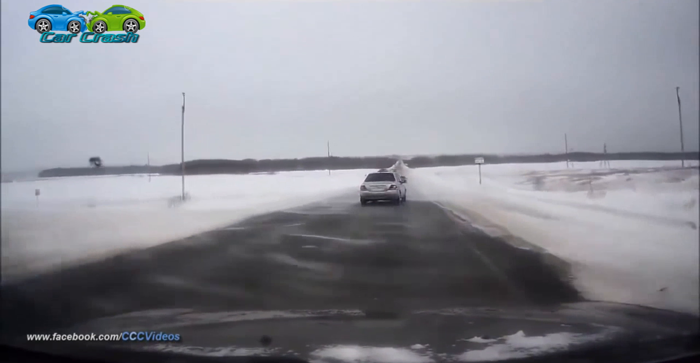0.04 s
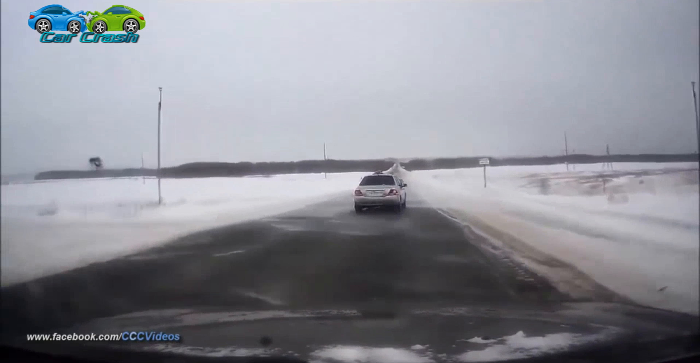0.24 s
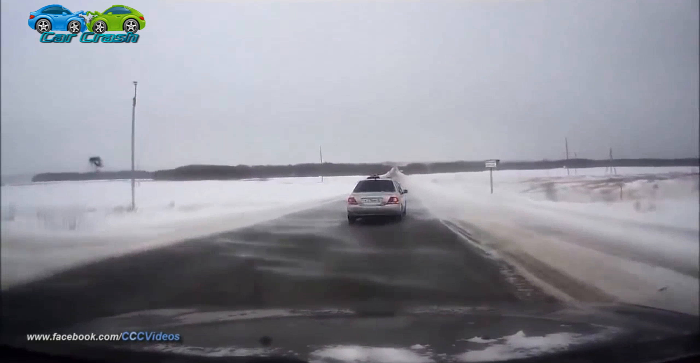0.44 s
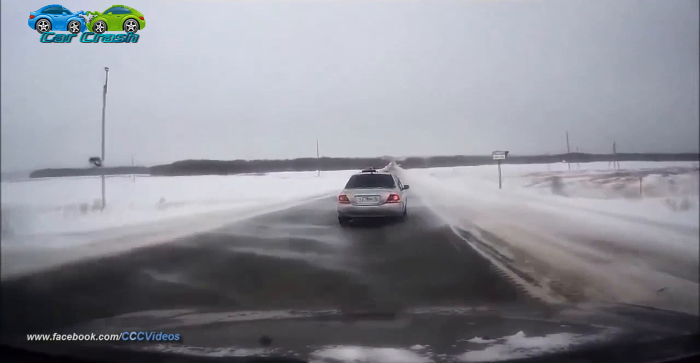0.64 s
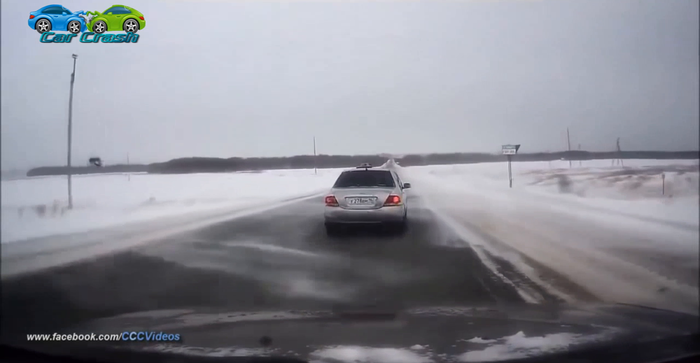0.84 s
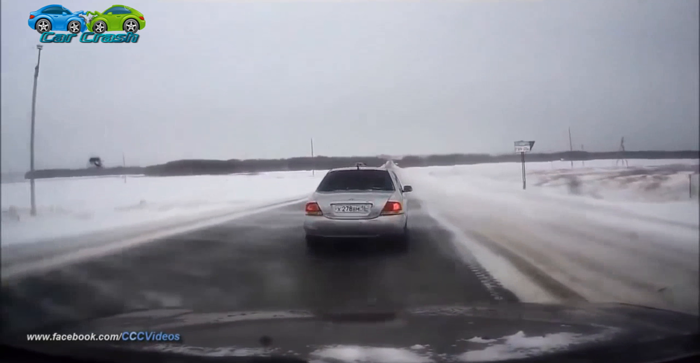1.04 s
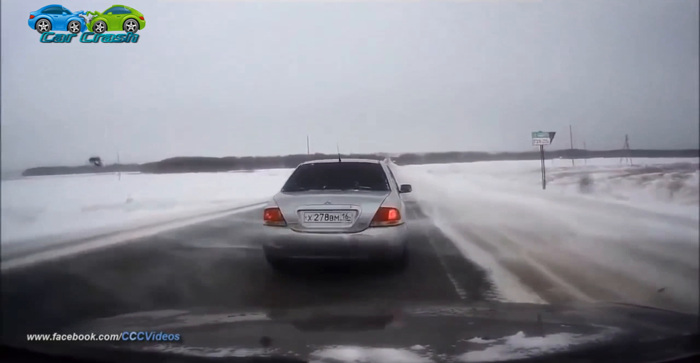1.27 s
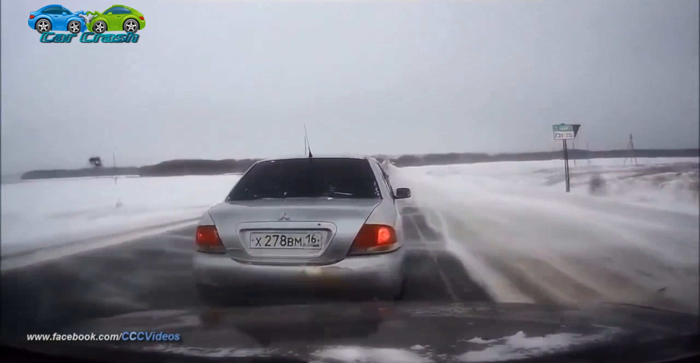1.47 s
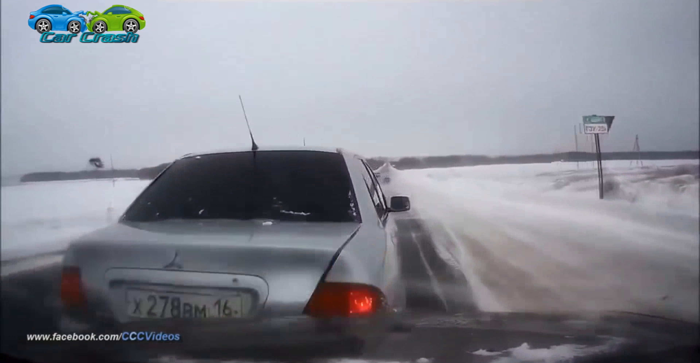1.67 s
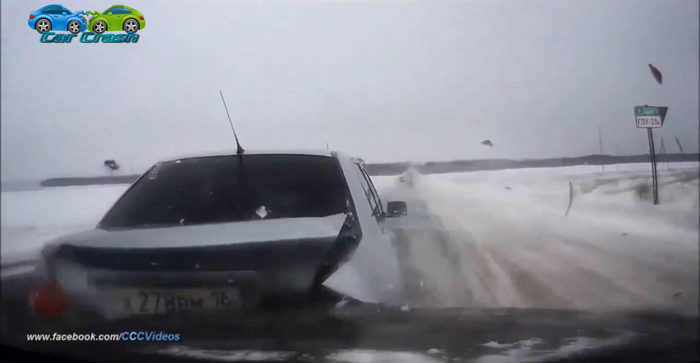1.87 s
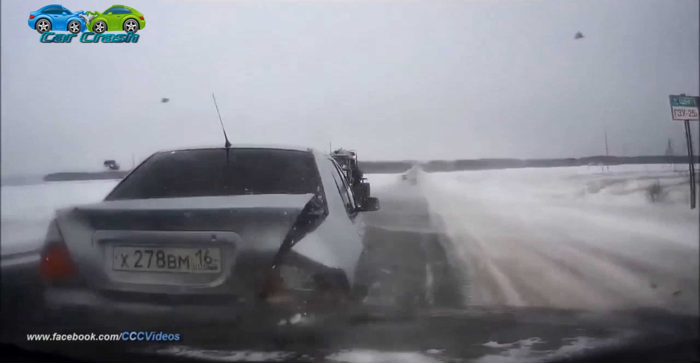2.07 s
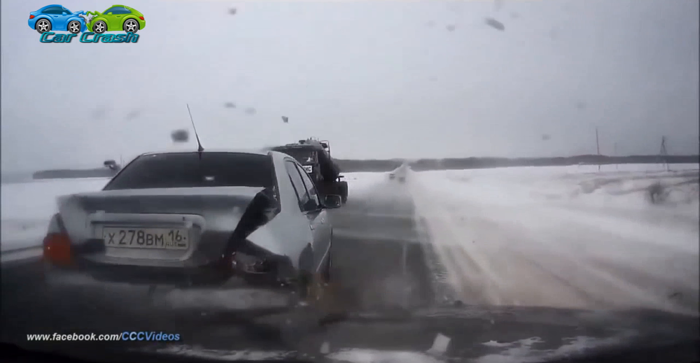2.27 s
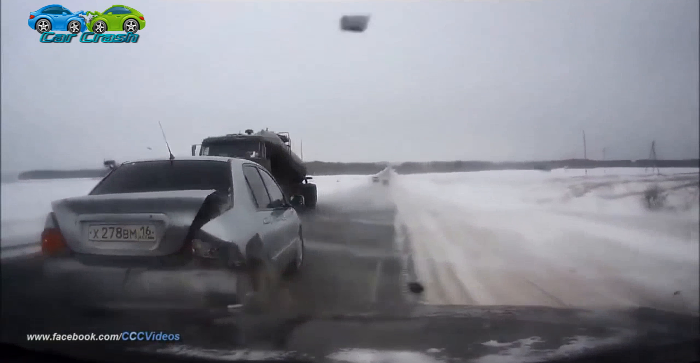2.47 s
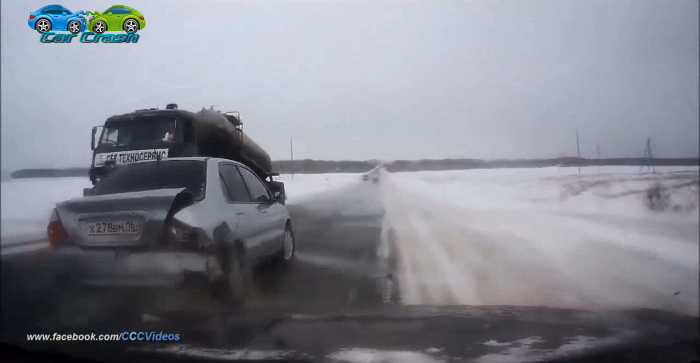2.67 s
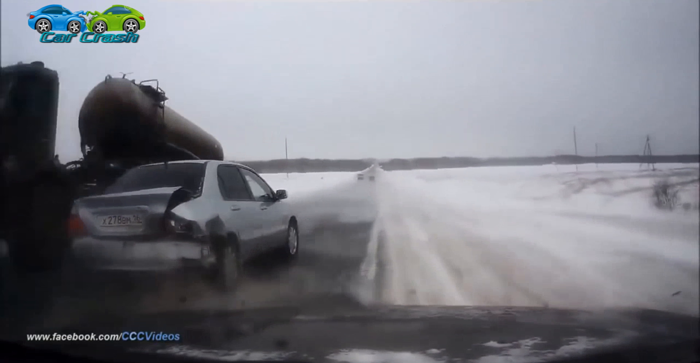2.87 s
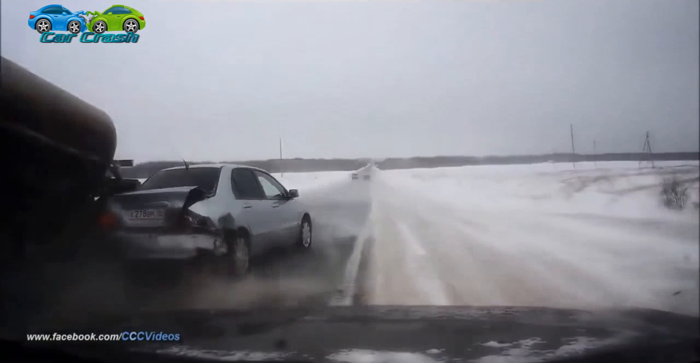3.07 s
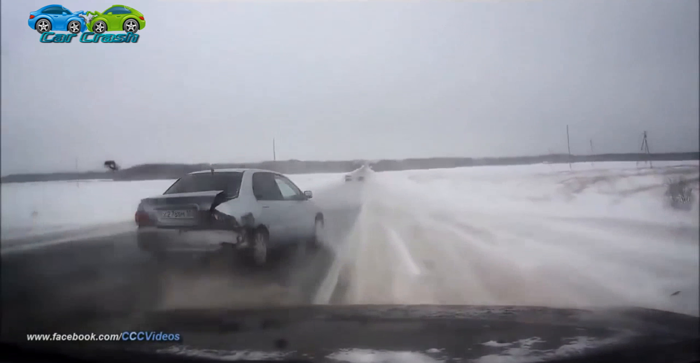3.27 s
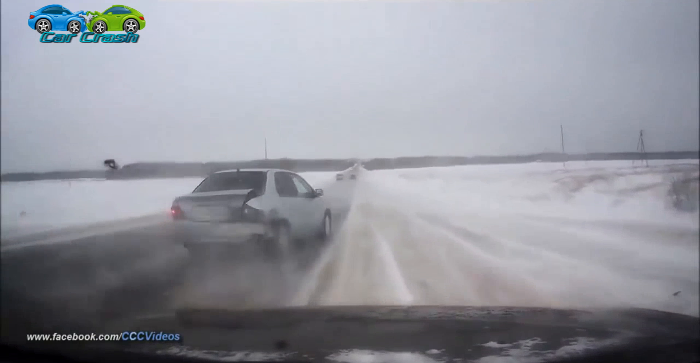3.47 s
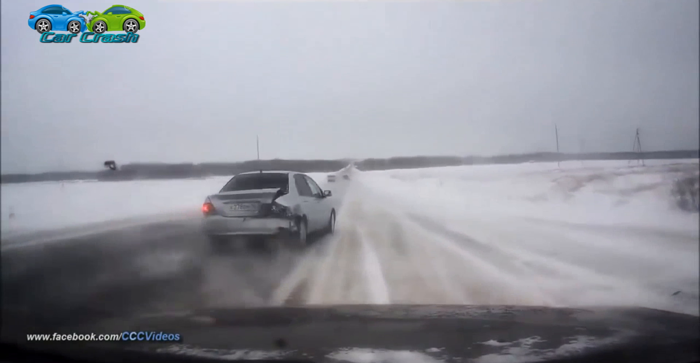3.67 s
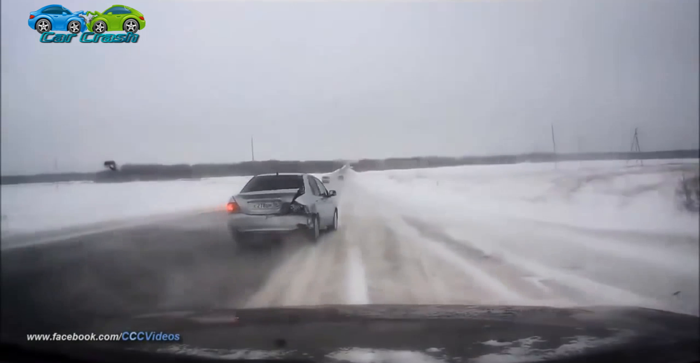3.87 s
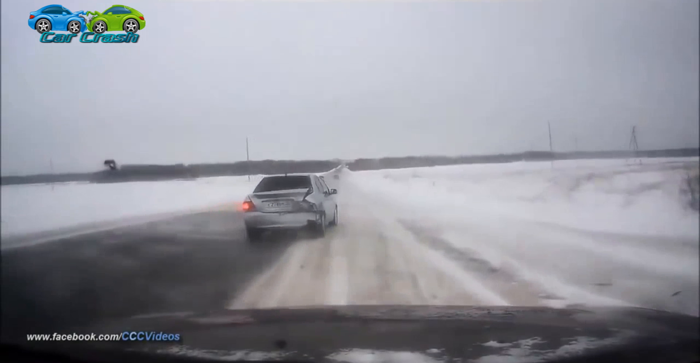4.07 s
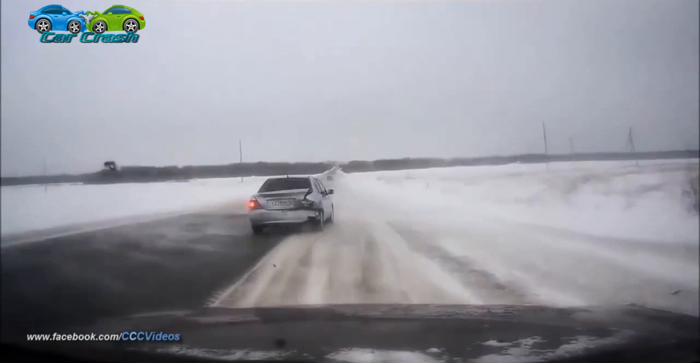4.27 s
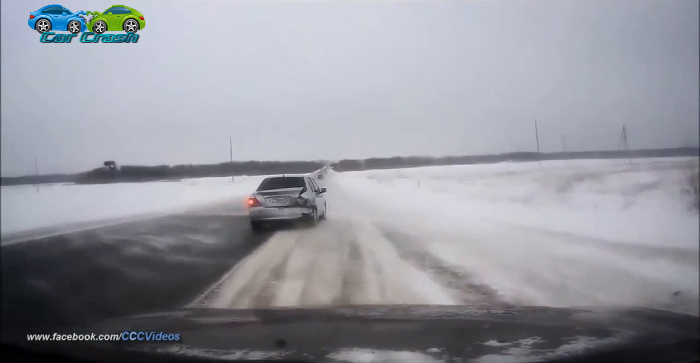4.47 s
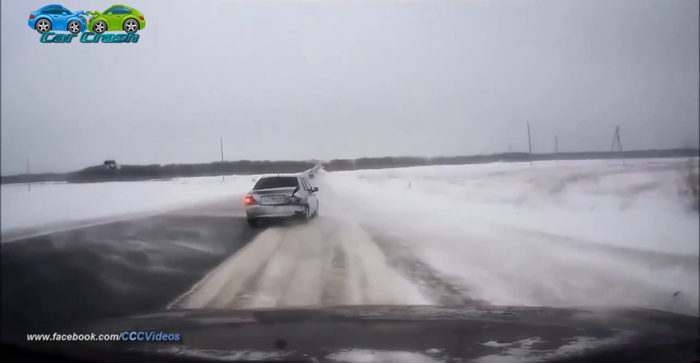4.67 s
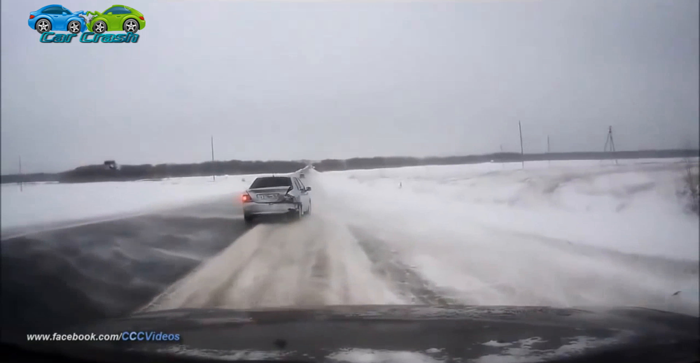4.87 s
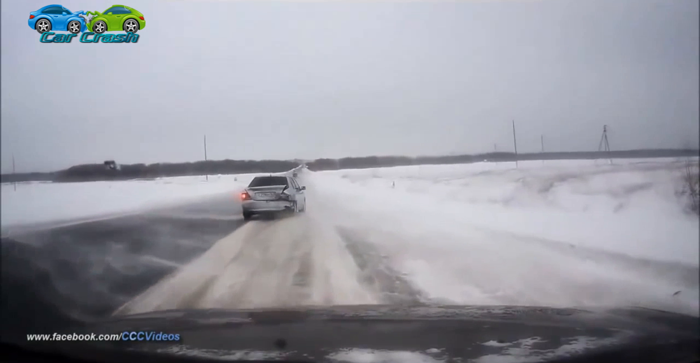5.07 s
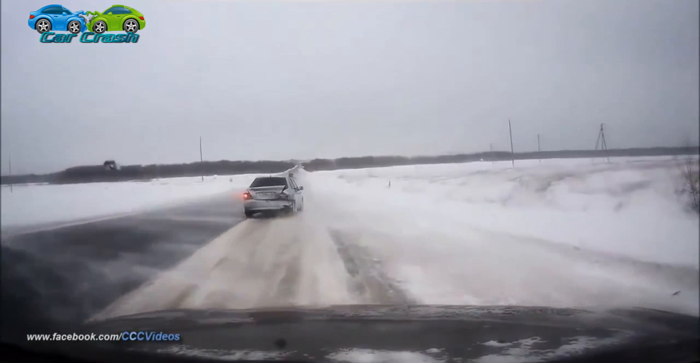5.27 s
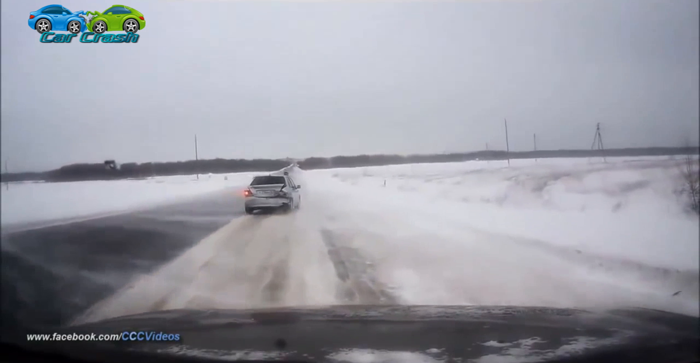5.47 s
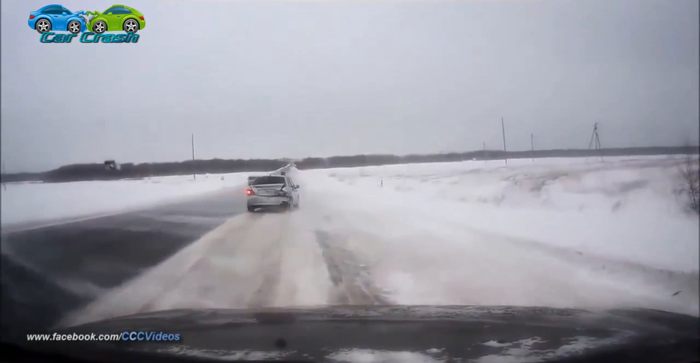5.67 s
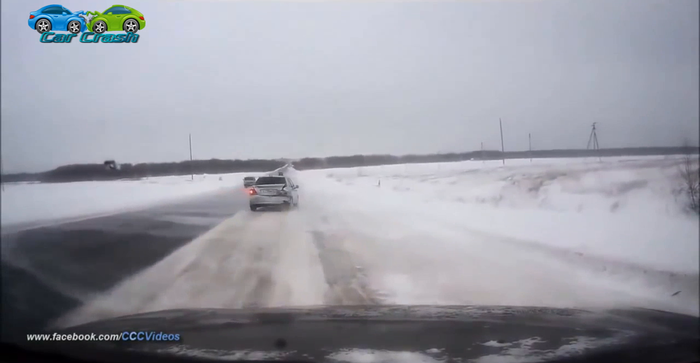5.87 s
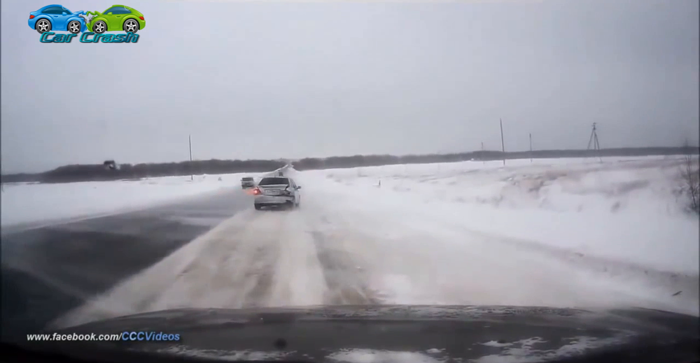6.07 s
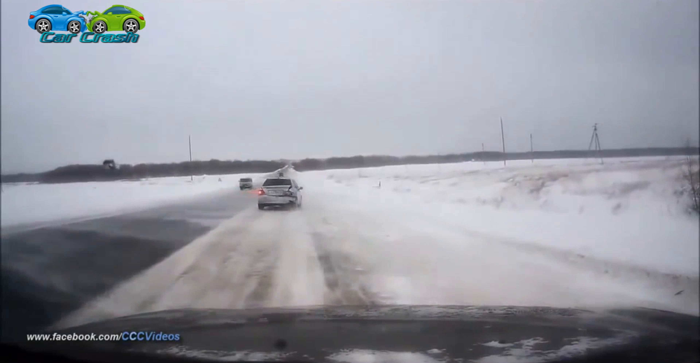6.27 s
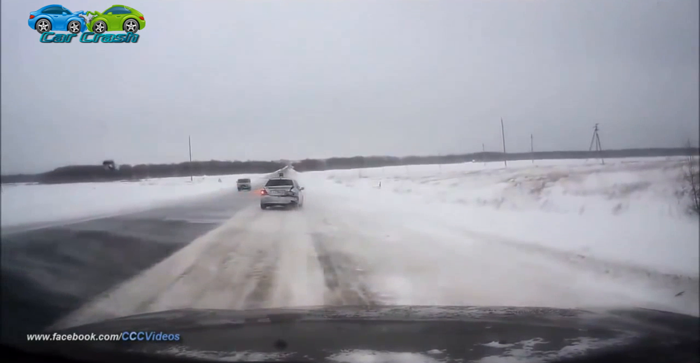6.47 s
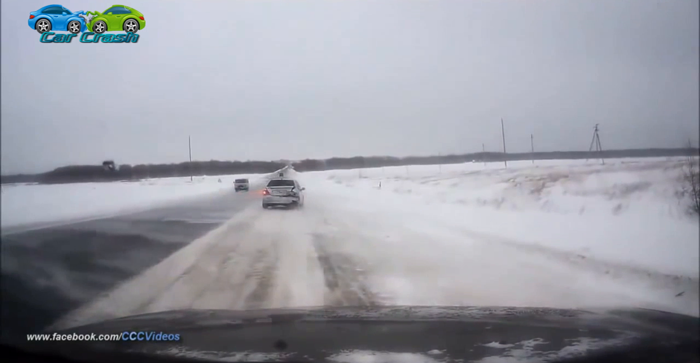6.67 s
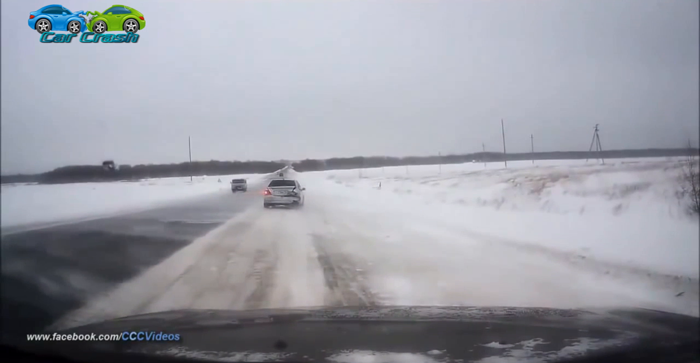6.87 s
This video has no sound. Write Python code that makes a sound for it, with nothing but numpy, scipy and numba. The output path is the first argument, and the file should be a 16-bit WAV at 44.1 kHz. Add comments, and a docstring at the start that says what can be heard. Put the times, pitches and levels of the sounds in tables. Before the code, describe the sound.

Heard from a dashboard microphone inside a car on a snowy road: deep rumble, tyre roar and faint slush hiss. Nearly two seconds in, a sudden crash booms and crunches, clipping flat, with crumpling metal and splintering plastic. Loose objects knock and rattle around the cabin, then a bent part taps regularly while the car slows and the road noise sinks toward quiet.

```python
"""Inside a car on a snowy road: tyre rumble, roar and slush hiss, then a rear-end crash that overloads the
dashboard camera. Sinking low notes and jerky bursts of noise make the crushed panels. Short pushes and
rattles ring the cabin trim as loose things knock about, and a bent part taps once a wheel turn as the car
slows. Ridges thump, bent metal scrapes, and the preamp adds a faint hiss and a thin whine."""
import sys
import numpy as np
from scipy import signal
from scipy.fft import rfft, irfft
from scipy.io import wavfile
from scipy.ndimage import uniform_filter1d
from numba import njit

SR = 44100
rng = np.random.default_rng(int(sys.argv[2]) if len(sys.argv) > 2 else 0)


def volts_from_decibels(level):
    """Turn decibel levels (scalar or array-like) into linear amplitude factors."""
    exponent = np.asarray(level, float) / 20
    return 10 ** exponent


def file_out(sig):
    """Save sig as 16-bit WAV at sys.argv[1]."""
    # one column per channel
    cols = np.atleast_2d(sig).T
    # limit, then scale
    lim = np.clip(cols, -1, 1)
    pcm = np.round(lim * 32767).astype(np.int16)
    wavfile.write(sys.argv[1], SR, pcm)


N = 306042  # length in samples
T = np.arange(N) / SR  # time in seconds

# How the body booms over the road, also used for its shaking in the crash.
# Each row: frequency in Hz, relative strength in dB per Hz.
RUMBLE_SPECTRUM = [(12, -37), (22, -2), (38, -0.5), (52, -5), (68, 1.5), (92, -3.5), (122, -3.5),
                   (150, -8.5), (185, -18), (220, -18), (290, -27.5), (480, -97.5)]


def level(x):
    """Scales a sound to an rms (average strength) of 1."""
    return x / np.sqrt(np.mean(x ** 2))


def coloured(x, spectrum):
    """Filters x by a curve of (Hz, dB) points, then scales it to an rms of 1."""
    hz, db = np.transpose(spectrum)
    log_hz = np.log(np.arange(N // 2 + 1) * SR / N + 1)
    gain = volts_from_decibels(np.interp(log_hz, np.log(hz), db, left=-90, right=-90))
    return level(irfft(rfft(x) * gain, N))


@njit
def svf(x, hz, width):
    """Resonant band-pass filter whose centre and width (Hz) are given for every sample."""
    y, band, low = np.empty(len(x)), 0., 0.
    for i in range(len(x)):
        g = np.tan(np.pi * hz[i] / SR)
        damping = width[i] / hz[i]
        v = (band + g * (x[i] - low)) / (1 + g * (g + damping))
        band = 2 * v - band
        low = low + 2 * g * v
        y[i] = damping * v
    return y


def walk(rate):
    """Slow random wandering: levels held for 1 / rate seconds, smoothed twice; spread near 1."""
    hold = int(SR / rate)
    steps = np.repeat(rng.standard_normal(N // hold + 1), hold)
    return 1.6 * uniform_filter1d(uniform_filter1d(steps, hold), hold)[:N]


def grit(spread_db, flicker_db, rate):
    """Dense particles of uneven size whose flow flickers."""
    size_db = spread_db * rng.exponential(size=N)
    return rng.standard_normal(N) * volts_from_decibels(size_db + flicker_db * walk(rate))


def burst(s, db, rise_s, t60):
    """Gain that swells from time s and dies away by 60 dB every t60 seconds."""
    t = np.maximum(T - s, 0)
    return volts_from_decibels(db - 60 * t / t60) * (1 - np.exp(-t / rise_s))


def booming():
    """The struck shell booms on unsteady sinking notes over a rough heave."""
    # Each row: start in seconds, level in dB, starting note in Hz, seconds to die by 60 dB.
    booms = [(1.72, -1.5, 119.4, .3), (1.745, 2, 54.6, 0.36), (1.793, -4, 140, 0.34),
             (1.85, -0.5, 27.7, 0.28), (1.885, -1, 57.7, 0.25), (1.935, -13.5, 30, .25),
             (2.0, -17.5, 44.4, 0.44), (2.127, -6, 121.3, 0.1), (2.157, -6.5, 140.2, .25)]
    # Rough shaking of the whole shell: start in seconds, level in dB, rise in seconds, seconds to die by 60 dB.
    heave = (1.72, -5, .012, 0.56)
    rise_s, sag_per_s = 0.0066, 2.2  # sag: how fast each note sinks
    unsteady, stiff = np.exp(.1 * walk(80)), .25 * walk(60)
    boom = burst(*heave) * coloured(rng.standard_normal(N), RUMBLE_SPECTRUM)
    for s, db, hz, t60 in booms:
        note_hz = hz * unsteady * np.exp(-sag_per_s * (T - s)) * (T > s)
        phase = 2 * np.pi * np.cumsum(note_hz) / SR
        # a second, stiffer shell mode comes and goes
        boom = boom + burst(s, db, rise_s, t60) * (np.sin(phase) + stiff * np.sin(1.8 * phase))
    return boom


def tearing():
    """Panels give way: sheet metal crumples and plastic splinters, both as gritty noise in jerks."""
    # Each row: start in seconds, crumple level in dB, splinter level in dB, seconds to die by 60 dB.
    tears = [(1.726, -8.5, -27.5, 0.43), (1.754, -8, -27.5, 0.16), (1.785, 5, -13, 0.084),
             (1.824, -13.5, -33, 0.42), (1.869, -16.5, -36, 0.42), (1.924, -15.5, -27, 0.19),
             (1.99, -28, -50, 0.46), (2.129, -25.5, -37.5, 0.54), (2.163, -25, -33.5, 0.19),
             (2.234, -27, -45, .4), (2.325, -35.5, -47, 0.63), (2.385, -34, -49.5, 0.27)]
    # The sound of sheet metal. Each row: frequency in Hz, relative strength in dB per Hz.
    crumple_spectrum = [(110, -14.5), (180, 9.5), (241, 2), (435, -5.5), (611, -0.5), (941, -9.5),
                        (1310, -14), (1700, -27.5), (2210, -58.5), (3740, -120)]
    # The sound of plastic. Each row: frequency in Hz, relative strength in dB per Hz.
    splinter_spectrum = [(1000, -33.5), (1700, -5), (2120, 1), (2630, 3.5), (3460, -3.5), (3800, -3),
                         (4970, -14), (5660, -12.5), (8820, -20), (13500, -21), (15900, -24)]
    rise_s = 0.0046
    jerks = volts_from_decibels(1.54 * walk(200))
    crumple = coloured(grit(spread_db=4.0, flicker_db=1.5, rate=60), crumple_spectrum)
    crumple = crumple * sum(burst(s, db, rise_s, t60) for s, db, _, t60 in tears)
    splinter = coloured(grit(spread_db=3.0, flicker_db=-2.05, rate=120), splinter_spectrum)
    splinter = splinter * sum(burst(s, db, rise_s, t60) for s, _, db, t60 in tears)
    return jerks * (crumple + splinter)


def ring_trim(contacts, push_s, rattle):
    """Each contact is a short push and a dying rattle that ring the trim, most near the struck spot's note."""
    # What cabin trim rings with. Each row: frequency in Hz, width in Hz, strength in dB.
    trim = [(420, 160, -1), (600, 130, 1), (810, 170, 0), (1050, 200, -4), (1300, 180, -6), (1650, 240, -5),
            (2000, 220, -2), (2480, 240, 0), (3050, 480, -4), (3750, 480, -8), (5400, 1100, 0),
            (6600, 1400, -4), (8500, 2500, -5), (12000, 4000, -6)]
    out, t = np.zeros(N), np.arange(SR // 9) / SR
    for s, dull_db, bright_db, crack_db, spot_hz in contacts:
        # 0.054 s at 1 kHz and a -44 dB bright ring; higher spots and harder pieces die sooner
        t60 = 0.054 * (spot_hz / 1e3) ** -.4 * volts_from_decibels(-0.1 * (bright_db + 44))
        push = (t < push_s) / np.sqrt(push_s * SR)
        contact = push + rattle * rng.standard_normal(len(t)) * volts_from_decibels(-60 * t / t60)
        rings = np.zeros((3, len(t)))  # dull, bright and crack
        for hz, width, db in trim:
            near_db = 11 * np.exp(-(np.log(hz / spot_hz) / .2) ** 2)
            f, w = hz + 0 * t, width + 0 * t
            ring = svf(svf(contact, f, w), f, 2 * w) / np.sqrt(width)
            band = np.searchsorted([1500, 4500], hz)
            rings[band] += volts_from_decibels(db + near_db) * ring
        for band, top_hz in ((0, 1500), (1, 4500)):
            # padding dulls each ring
            rings[band] = signal.lfilter(*signal.butter(3, top_hz, fs=SR), rings[band])
        gains = volts_from_decibels([dull_db, bright_db, crack_db]) / np.abs(rings).max(axis=1)
        i = int(s * SR)
        out[i:i + len(t)] += (gains @ rings)[:N - i]
    return out


def knocking():
    """Loose things knock about the cabin and ring its trim."""
    # Each row: start in seconds, peaks of the dull, bright and crack parts in dB, note of the struck spot in Hz.
    knocks = [(1.927, -11, -18, -33, 805), (2.073, -8.5, -10.5, -28, 790), (2.167, -10, -15.5, -39, 1977),
              (2.256, -22, -25, -54, 772), (2.327, -27.5, -44, -55, 1350), (2.377, -25.5, -47, -58.5, 573),
              (2.457, -45, -48.5, -57, 3600), (2.483, -23, -14.5, -27.5, 3360),
              (2.529, -44, -38, -53, 3320), (2.549, -45.5, -41, -53, 3500), (2.617, -48, -44.5, -52, 3670),
              (2.715, -43, -43, -68, 3820), (2.821, -31, -56, -70, 445), (3.046, -19.5, -48, -72, 673),
              (3.087, -32, -40, -70, 2820), (3.145, -31, -42.5, -58, 3740), (3.351, -24.5, -29, -56, 2020),
              (3.478, -45, -41.5, -62.5, 3800), (4.082, -53, -52, -82, 2500), (4.454, -59, -54, -66, 4000),
              (4.77, -61, -49, -61.5, 2630), (6.16, -42, -47.5, -68, 2725), (6.23, -31, -49.5, -79.5, 1240),
              (6.44, -36.5, -52, -84, 2480), (6.925, -32, -51, -76, 860)]
    return ring_trim(knocks, push_s=.00006, rattle=.25)


def tapping():
    """A bent part touches once a wheel turn, with more rattle than the loose things."""
    # Each row: start in seconds, peaks of the dull and bright parts in dB, note of the struck spot in Hz.
    taps = [(3.443, -31, -39.5, 600), (3.738, -26, -40, 2540), (4.015, -30.5, -44.5, 620),
            (4.287, -33, -59, 610), (4.584, -37, -49, 2460), (4.902, -43, -48.5, 2250),
            (5.219, -47, -53, 1820), (5.533, -56, -52.5, 2395), (5.861, -42, -52.5, 2450)]
    crack_db = -25  # relative to the bright part
    contacts = [(s, dull_db, bright_db, bright_db + crack_db, hz) for s, dull_db, bright_db, hz in taps]
    return ring_trim(contacts, push_s=.0001, rattle=.45)


def thumping():
    """Wheels drop over ridges: a soft push rings the body low."""
    # Suspension thumps. Each row: start in seconds, level in dB, note in Hz, seconds to die by 60 dB.
    thumps = [(0.631, -11, 70, .15), (2.79, -16, 108, 0.21), (4.742, -16, 70.8, 0.34),
              (6.702, -13.5, 72.4, 0.056)]
    return sum(burst(s, db, 0.0078, t60) * np.sin(2 * np.pi * hz * (T - s)) for s, db, hz, t60 in thumps)


def scraping():
    """Bent metal drags after the crash: a thin gritty band, catching and letting go."""
    centre_hz = 3800 + 0 * T
    band = svf(grit(spread_db=2.5, flicker_db=4.0, rate=41), centre_hz, 380 + 0 * T)
    band = svf(band, centre_hz, 600 + 0 * T)
    return level(band) * burst(2.8, -65.5, rise_s=.3, t60=8.5)


def rolling():
    """Body boom from the road surface, cabin drone, tread roar and slush thrown into the arches."""
    # Rolling as speed and road roughness change.
    # Each row: time in seconds, rumble level in dB, rolling effort in dB, slush hiss level in dB.
    course = [(0.0, -27.5, 0, -55), (0.3, -23, 2.5, -50.5), (0.6, -27.5, 0, -55), (0.85, -27.5, 0, -55),
              (1.55, -27.5, -1, -54.5), (2.55, -27, -2.5, -54.5), (2.74, -29.5, -3, -57),
              (2.82, -21, 5.5, -54), (2.92, -27, -1, -56), (3.1, -30.5, -1, -54), (3.22, -26, -0.5, -53),
              (3.55, -25, -3, -57), (4.28, -29, -7, -64), (4.9, -30.5, -7.5, -68), (5.2, -34, -9.5, -74.5),
              (5.8, -37, -8.5, -70.5), (6.3, -36, -9, -73), (6.9, -38, -8.5, -67)]
    # The cabin's drone. Each row: frequency in Hz, relative strength in dB per Hz.
    drone_spectrum = [(110, -41), (180, -12.5), (231, -1), (280, -2.5), (323, 0.5), (387, -4), (425, -8),
                      (500, -5.5), (750, -12.5), (980, -18), (1650, -120)]
    # The tread's roar. Each row: frequency in Hz, relative strength in dB per Hz.
    roar_spectrum = [(410, -34), (700, -2.5), (945, -3), (1130, 1.5), (1260, -3.5), (1410, -8), (1520, -17),
                     (1680, -18), (1800, -23.5), (2340, -57.5), (3960, -120)]
    # The slush's hiss. Each row: frequency in Hz, relative strength in dB per Hz.
    slush_spectrum = [(1100, -35), (1600, -23.5), (1850, -5.5), (2230, 2.5), (2590, 0), (3050, -5.5),
                      (3350, -10), (3900, -13.5), (4300, -20.5), (4830, -27), (6500, -30.5), (15000, -29.5),
                      (15300, -81)]
    s, *columns = np.transpose(course)
    rumble_db, effort_db, slush_db = (np.interp(T, s, column) for column in columns)
    drone_db = -35.5 + 0.84 * effort_db
    # from 2.3 s the tyres leave bare asphalt for packed snow and roar 8 dB less
    roar_db = -40.5 + effort_db - 8 * (T > 2.3)
    bumps = walk(16)  # road bumps shake all layers at once
    rumble = coloured(grit(spread_db=-0.5, flicker_db=0.5, rate=14), RUMBLE_SPECTRUM)
    drone = coloured(grit(spread_db=0.5, flicker_db=1.0, rate=52), drone_spectrum)
    roar = coloured(grit(spread_db=1.5, flicker_db=0.65, rate=40), roar_spectrum)
    slush = coloured(grit(spread_db=2.5, flicker_db=0.47, rate=28), slush_spectrum)
    body = rumble * volts_from_decibels(rumble_db + 0.43 * bumps) + drone * volts_from_decibels(drone_db + 0.54 * bumps)
    return body + roar * volts_from_decibels(roar_db + 0.3 * bumps) + slush * volts_from_decibels(slush_db + 0.75 * bumps)


def preamp_hiss():
    """The preamp's steady faint noise."""
    # Each row: frequency in Hz, relative strength in dB per Hz.
    hiss_spectrum = [(2600, -19.5), (4500, -1), (15100, -5.5), (15300, -36)]
    return volts_from_decibels(-77) * coloured(rng.standard_normal(N), hiss_spectrum)


def preamp_whine():
    """A thin high tone whose pitch wavers slightly."""
    phase = 2 * np.pi * np.cumsum(7868 + 25 * walk(150)) / SR  # Hz
    return volts_from_decibels(-84.5) * np.sqrt(2) * np.sin(phase)


def scene():
    """Everything heard in the cabin, as one channel."""
    crash = booming() + tearing()
    contacts = knocking() + tapping()
    return (crash + contacts + thumping() + scraping() + rolling())[None]


def low_pass(x):
    """Removes everything above the highest recorded frequency."""
    return signal.sosfilt(signal.butter(12, 16660, fs=SR, output="sos"), x)


def record(dry):
    """The preamp clips flat, rolls off the treble and adds hiss and whine; a steep filter cuts the top."""
    clip_level, knee = .29, 8  # a higher knee clips more sharply
    clipped = dry / (1 + np.abs(dry / clip_level) ** knee) ** (1 / knee)
    soft = signal.lfilter(*signal.butter(1, 11000., fs=SR), clipped)
    noisy = soft + preamp_hiss() + preamp_whine()
    top_cut = signal.ellip(8, .2, 60, 16300, fs=SR, output="sos")
    return low_pass(signal.sosfilt(top_cut, noisy))


dry = scene()
out = record(dry)
file_out(out)
```